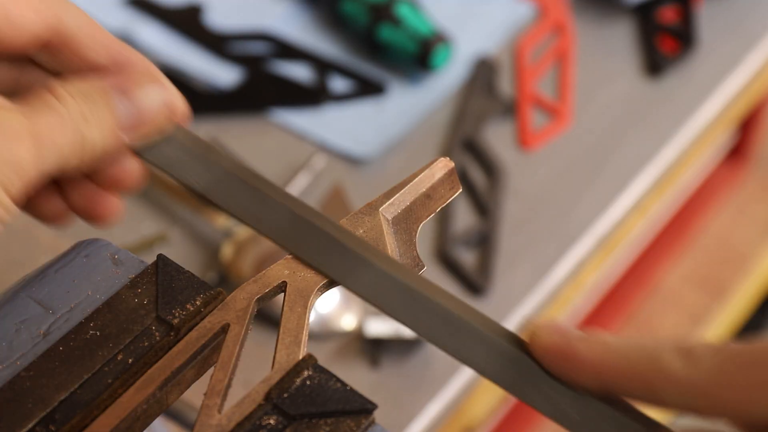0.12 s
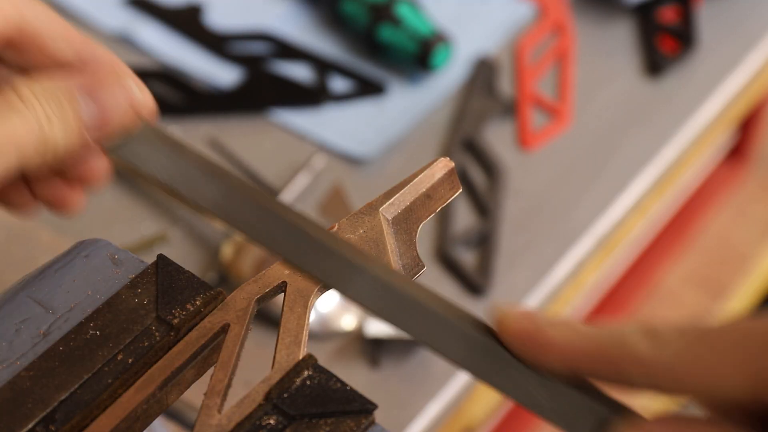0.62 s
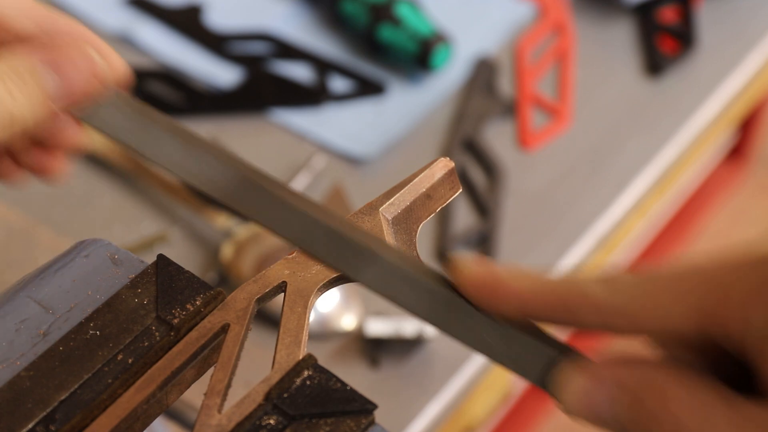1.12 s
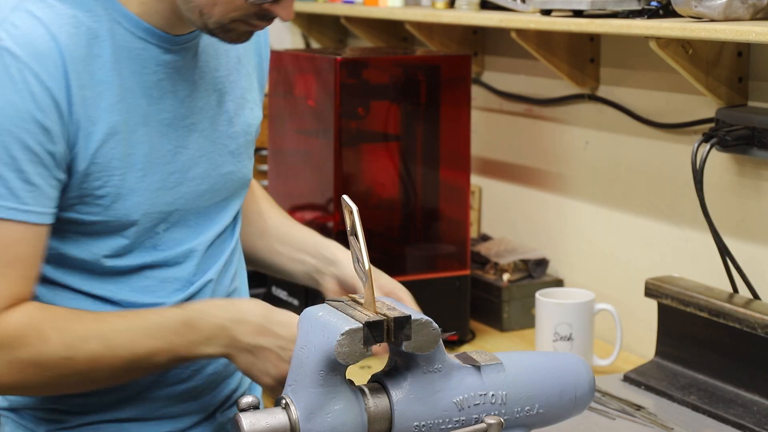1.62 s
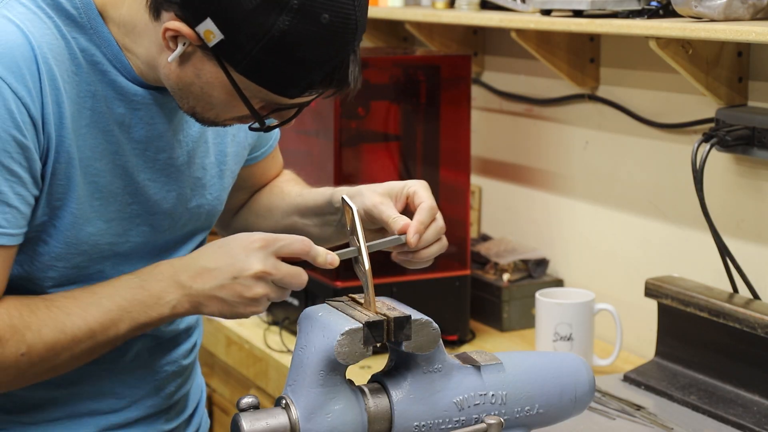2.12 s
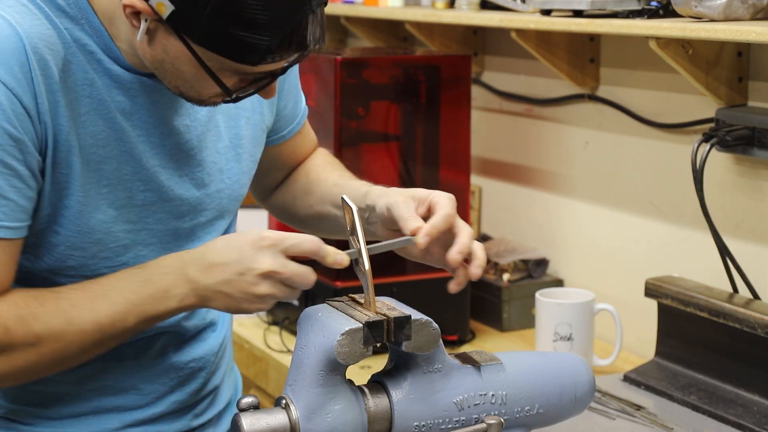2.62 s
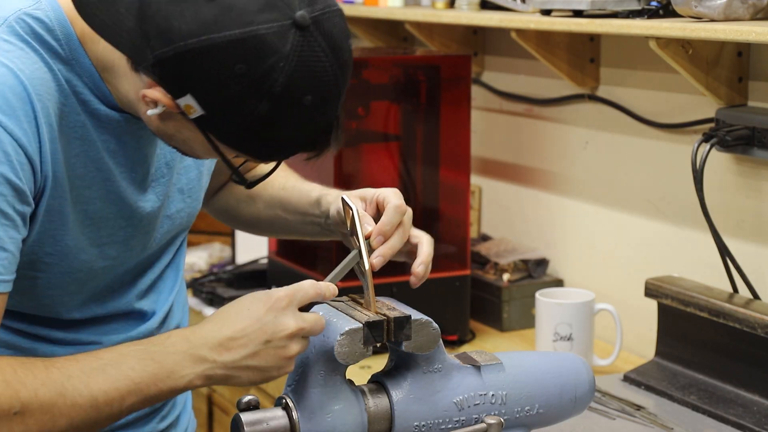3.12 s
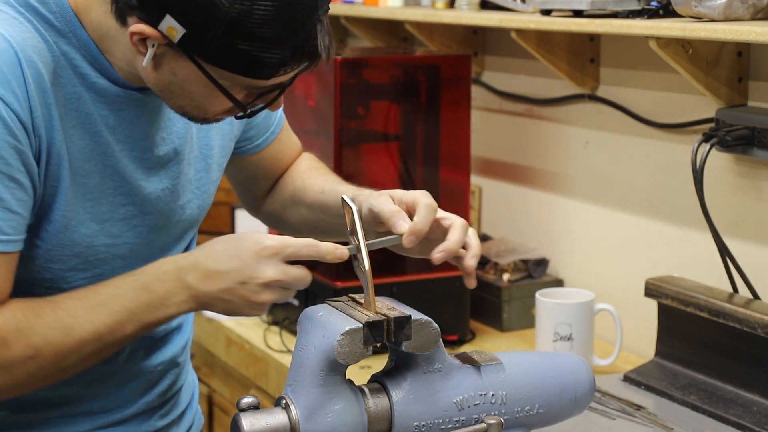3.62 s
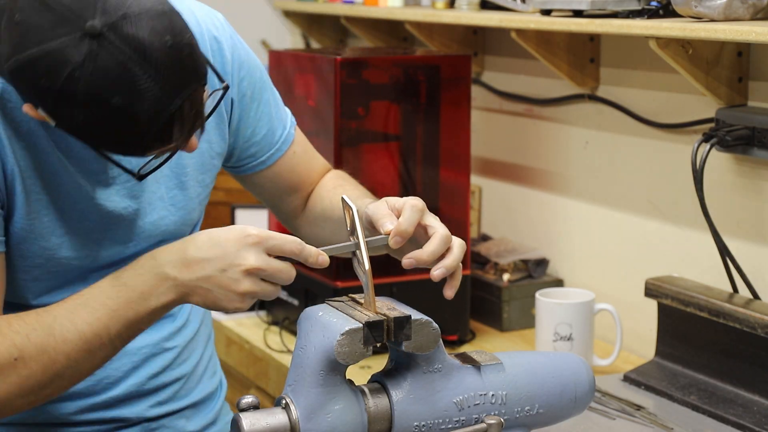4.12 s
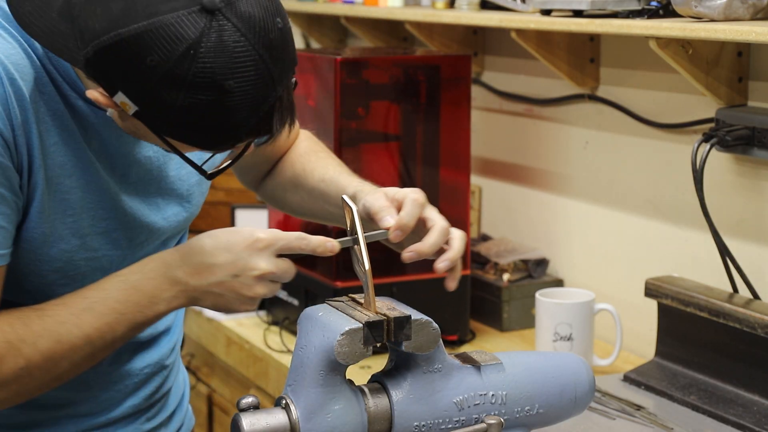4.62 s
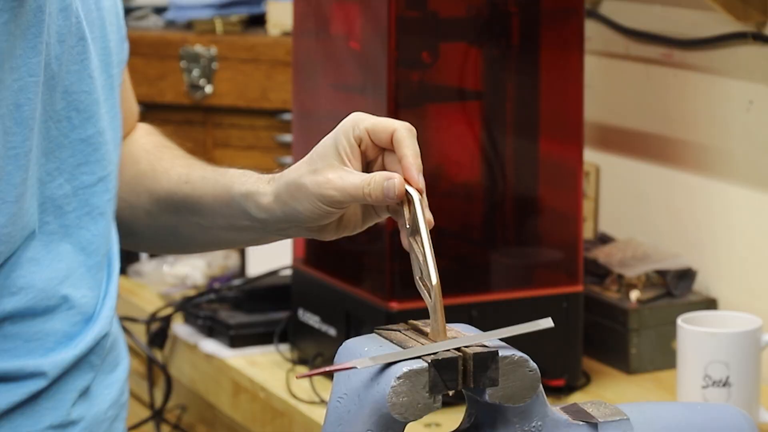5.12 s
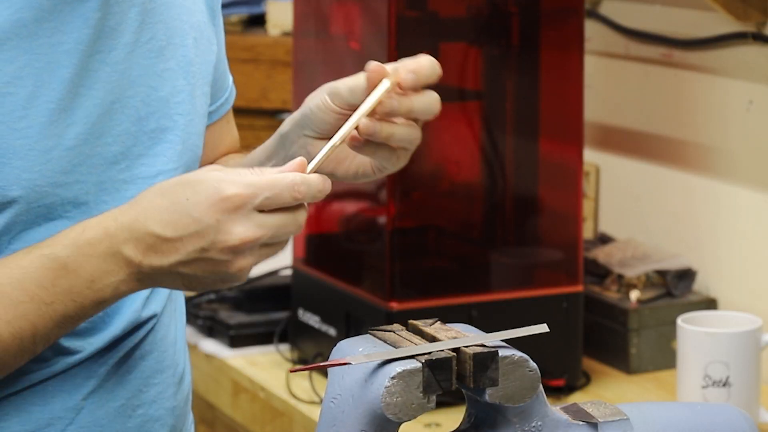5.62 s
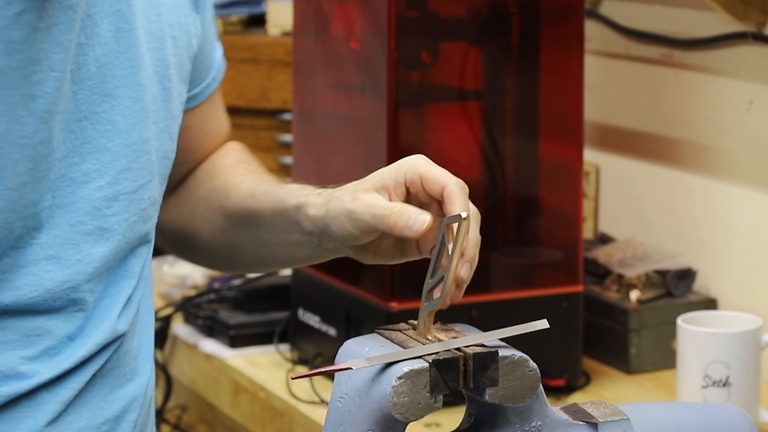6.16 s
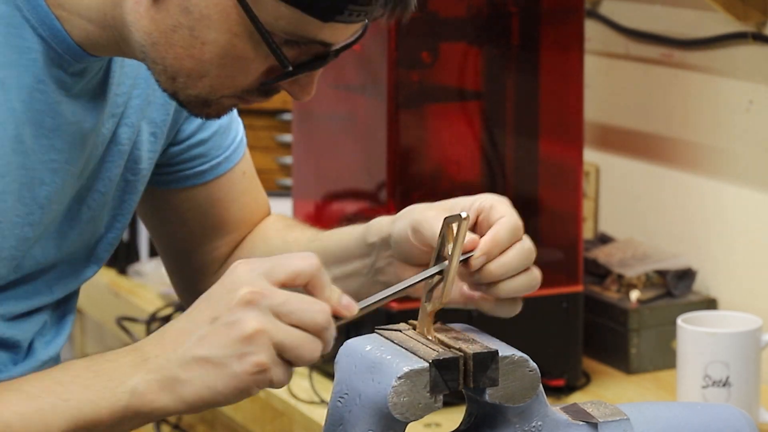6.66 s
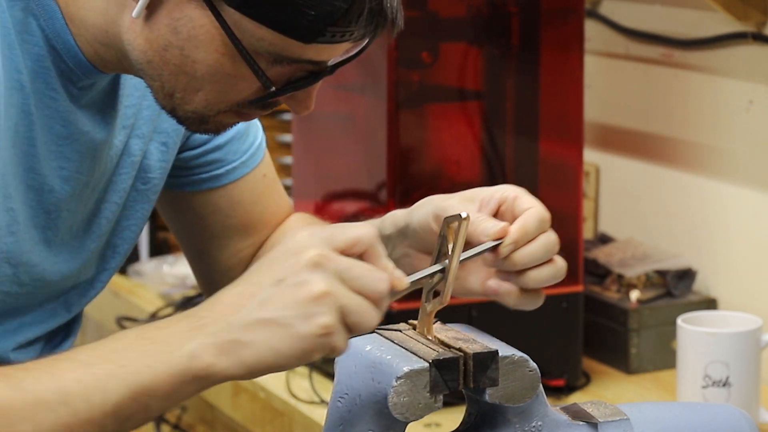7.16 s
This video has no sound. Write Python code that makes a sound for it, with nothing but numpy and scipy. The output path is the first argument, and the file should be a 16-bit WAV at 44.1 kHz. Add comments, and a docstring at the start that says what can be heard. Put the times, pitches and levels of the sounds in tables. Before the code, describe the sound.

Sped-up metal filing: bright squealing scrapes over faint workshop whirr, sharp metallic knocks as the piece is reclamped, then a short final bout.

```python
"""A workshop bench: room air and a motor, then sharp knocks and short rubs of metal.
A hand file rasps on a thin casting in a vise, its short strokes sped up to a very quick pace; the motor swells.
At 1.54 s the scene cuts to different room air and a steady whine, and the second grip is filed.
From 5.2 s the casting is taken out, handled and clamped again, with faint whistles; a third bout follows.
Scrapes and rings are shaped noise; motor, whine, whistles and squeaks are sines; a short tail is the room."""
import sys
import numpy as np
from scipy import signal
from scipy.fft import rfft, irfft, next_fast_len
from scipy.io import wavfile
from scipy.ndimage import uniform_filter1d, map_coordinates

SR = 44100
rng = np.random.default_rng(int(sys.argv[2]) if len(sys.argv) > 2 else 0)


def how_loud(loudness_db):
    """Turn decibels into a plain amplitude multiplier (0 dB gives 1, 20 dB gives 10)."""
    steps = np.asarray(loudness_db, float) / 20
    return 10 ** steps


def to_wav(s):
    """Save 16-bit WAV."""
    ch = np.atleast_2d(s).T  # columns
    pcm = np.round(np.clip(ch, -1, 1) * 32767)  # PCM
    wavfile.write(sys.argv[1], SR, pcm.astype(np.int16))


N = 320607
TIME = np.arange(N) / SR
CUT_S = 1.5445  # the scene cuts here from the first room air and motor to the second room air and whine

# room air before the cut, spectrum shape: pitch_hz [Hz], density_db [dB per Hz, relative]
FIRST_AIR = [(100, -40), (300, -18), (600, -0.5), (1000, -1.5), (1500, -6), (2400, 3.5), (3100, -10.5),
             (9400, -4.5), (16000, -19.5)]
# its level: time_s [s], level_db [dB rms]
FIRST_AIR_LEVEL = [(0, -68), (.9, -63), (1.15, -59.5), (1.3, -59.5), (1.45, -53), (1.545, -58.5)]
# a motor that speeds up and swells: time_s [s], pulse_rate_hz [Hz], swell_db [dB, before each order's share]
MOTOR = [(0, 187.4, 7), (1.051, 187.7, 9.5), (1.175, 198.4, 11.5), (1.25, 200.5, 12), (1.331, 201.5, 20.5),
         (1.4, 203.7, 19), (1.451, 204, 8), (1.545, 202.4, 8)]
# its tones: multiple [of the pulse rate], level_db [dB rms before waver and swell], swell_share [factor]
MOTOR_ORDERS = [(4, -84, 1.23), (5, -81, 0.43), (6, -79.5, 0.3), (7, -88.5, 1.17), (8, -94, 1.68),
                (10, -89, 1), (11, -92, 0.74)]
# knocks of metal on metal: start_s [s], peak_db [dB, sharp part], low_db [dB, low part against the sharp],
# fall_60_db_s [s, at least 0.004 is used], brightest_hz [Hz]
KNOCKS = [(0.02, -26.5, -27, 0.024, 4600), (0.059, -36, -35, 0.014, 4600), (0.2217, -44, -5.5, 0.03, 1480),
          (1.5401, -21.5, -46, 0.0032, 5200), (1.6472, -32, -33, 0.011, 3080),
          (1.6593, -36, -36, .008, 7500), (2.5, -50, -20, 0.014, 5000), (2.5344, -38, -35, 0.05, 3480),
          (2.5525, -37.5, -9, 0.014, 2500), (3.904, -49.5, 2, 0.013, 4040), (4.3455, -37, -33, 0.033, 5100),
          (4.7285, -38.5, -36, 0.027, 2700), (5.1869, -19, -28, 0.012, 2900),
          (5.2055, -31.5, -18.5, 0.018, 3050), (5.3616, -46.5, -23, 0.035, 3800),
          (5.7685, -50.5, -32, 0.048, 7000), (5.962, -39.5, -22, 0.028, 5100),
          (5.9789, -40.5, -21, 0.02, 4960), (6.0394, -38, -19, 0.023, 4940),
          (6.0636, -43, -31, 0.016, 5040), (6.1195, -51, -48, .02, 7000),
          (6.1422, -23.5, -27.5, 0.016, 4500), (6.15, -37, -25, 0.032, 2800),
          (6.168, -44, -47, 0.017, 7500), (6.175, -40, -36, 0.018, 1890), (6.204, -45.5, -10, 0.018, 2200),
          (6.217, -30.5, -39, 0.057, 7500), (6.2338, -31.5, -3, 0.02, 2070),
          (6.3224, -45.5, -43, 0.038, 5000)]
# short modes of a knocked casting: pitch_hz [Hz], level_db [dB, relative], fall_20_db_s [s]
KNOCK_MODES = [(1803, 3, 0.02), (2800, -4.5, 0.005), (3450, -6.5, 0.017), (3930, -11, 0.02),
               (5400, -10.5, .02), (5770, 1, 0.0069), (7000, -1, 0.019), (7900, 4.5, .015),
               (8620, 3, 0.028)]
# short grainy rubs and slides, in handling and between file strokes: start_s [s], end_s [s],
# level_db [dB rms before grain and fade], brightness_db [dB per octave]
RUBS = [(0.024, 0.064, -45.5, 6), (0.059, 0.118, -57, -1.5), (1.48, 1.513, -53, 9), (1.56, 1.585, -63, 5),
        (1.599, 1.611, -64, 7), (1.634, 1.682, -46.5, 4), (1.687, 1.72, -64, 3), (1.723, 1.736, -60, 12),
        (1.822, 1.84, -67, 1), (1.788, 1.813, -54.5, 3.5), (1.948, 1.967, -43.5, 0),
        (1.981, 1.985, -54, -7), (2.547, 2.56, -59, -6), (4.344, 4.358, -43.5, 7), (5.181, 5.193, -32, 2.5),
        (5.193, 5.221, -56, -2.5), (5.409, 5.44, -47, 4), (5.896, 5.93, -62, -1), (6.027, 6.077, -51, 0.5),
        (6.116, 6.137, -62.5, -1), (6.15, 6.194, -64, -3), (6.198, 6.259, -51.5, 1.5),
        (6.263, 6.28, -56, 3.5), (6.303, 6.338, -59, -1.5), (6.386, 6.422, -57, 6),
        (6.445, 6.454, -54.5, 6), (6.489, 6.536, -63.5, 5.5), (7.081, 7.104, -68, -3),
        (7.167, 7.205, -56.5, -3.5)]
# one table a grip, one row for each stroke that bites: hardest_bite_s [s], squeal_db [dB, both parts together],
# lean_db [dB, upper squeal against lower]
STROKES = [
    [(0.127, -39.5, -15), (0.157, -48, -27), (0.182, -46, -24), (0.232, -42.5, -29), (0.266, -44, -11),
     (0.289, -40, -2), (0.338, -40.5, 3), (0.359, -47, -10), (0.388, -42, -10), (0.416, -53, -15),
     (0.444, -37, -3), (0.465, -54, -15), (0.512, -52, -6), (0.536, -47, 4), (0.55, -44.5, 1),
     (0.578, -45, -10), (0.593, -41.5, -24), (0.609, -56.5, -27), (0.635, -43.5, -11), (0.65, -43.5, -7),
     (0.674, -48, -18), (0.691, -46, -15), (0.715, -50, -10), (0.733, -45.5, -11), (0.774, -46, -9),
     (0.794, -41.5, -6), (0.811, -45.5, -7), (0.834, -39.5, -5), (0.851, -41, -16), (0.878, -37.5, -10),
     (0.892, -39.5, -2), (0.961, -44, 0), (0.97, -30.5, -8.5), (0.978, -47, 8), (1.02, -48.5, -12),
     (1.029, -34.5, -17), (1.037, -58, 0), (1.068, -70, -5), (1.085, -42, -11), (1.107, -41, -12),
     (1.125, -51, 2), (1.142, -45, -16), (1.17, -45.5, -7), (1.213, -39.5, 0), (1.237, -44, -12),
     (1.252, -42, -4), (1.279, -35, -14), (1.322, -38, -12), (1.339, -40, -9), (1.379, -41, -8),
     (1.397, -37.5, -6), (1.429, -40, -5), (1.443, -45, -13), (1.459, -48, -12), (1.478, -51, -2)],
    [(1.87, -52, 9), (1.885, -73, 8), (1.917, -36.5, 7), (1.928, -30.5, -7), (1.962, -35, -1),
     (1.985, -35, 5), (2.015, -31, -5), (2.039, -31.5, -3), (2.077, -33, 4), (2.103, -28.5, -0.5),
     (2.136, -36, -3), (2.176, -36.5, 10), (2.214, -33, 2), (2.25, -34, 7), (2.285, -39.5, -4),
     (2.329, -42, 10), (2.367, -44.5, -8), (2.404, -42, -6), (2.442, -50.5, -11.0), (2.481, -66, 16),
     (2.516, -53, 6), (2.539, -37.5, 23), (2.553, -51, 23), (2.589, -45, 12), (2.633, -42.5, -11),
     (2.67, -43, -2), (2.709, -42.5, -9), (2.747, -39, 7), (2.78, -43, 17), (2.817, -43.5, 1),
     (2.868, -45, 5), (2.889, -45.5, 10), (2.905, -41, -16), (2.922, -38.5, -6), (2.942, -39.5, -4),
     (2.963, -43.5, 1), (2.997, -44, -4), (3.032, -44.5, 4), (3.065, -44.5, -7), (3.094, -48.5, -1),
     (3.169, -60, 3), (3.191, -78, 9), (3.214, -56, 1), (3.238, -58, 13), (3.264, -53.5, -1),
     (3.292, -51.5, -15), (3.325, -58, 1), (3.386, -46, 14), (3.416, -38.5, 21), (3.455, -46, 18),
     (3.47, -48, 8), (3.495, -36.5, 26), (3.532, -35, 26), (3.569, -44.5, 8), (3.602, -46.5, 8),
     (3.639, -45, 5), (3.672, -37, 5), (3.709, -46, 7), (3.742, -46, -2), (3.78, -47, 1), (3.813, -49.5, 2),
     (3.848, -48, -2), (3.888, -44, 3), (3.916, -45.5, -8), (3.952, -50.5, 0), (3.986, -52.5, 4),
     (4.013, -52, -8), (4.03, -57.5, -5), (4.056, -68, -4), (4.18, -54.5, -12), (4.195, -59, -2),
     (4.25, -61.5, 4), (4.294, -55.5, 4), (4.32, -61, 2), (4.348, -46, 6), (4.378, -75, 12),
     (4.397, -60, 17), (4.414, -56, 14), (4.435, -51, 14), (4.451, -51, 9), (4.469, -50, 15),
     (4.485, -52.0, 1), (4.501, -47.5, 18), (4.532, -47.5, 16), (4.566, -44, 18), (4.599, -50, 14),
     (4.637, -41.5, 22), (4.668, -43.5, 17), (4.698, -48.5, 15), (4.714, -51, 13), (4.729, -41.5, 13),
     (4.764, -45, 28), (4.796, -46.5, 14), (4.826, -46, 31), (4.861, -46, 18), (4.892, -46.5, 9),
     (4.926, -50, 12), (4.962, -48, 18), (4.996, -50, 11), (5.028, -47.5, 18), (5.059, -47.5, 4),
     (5.091, -42, 21), (5.124, -47.5, 25), (5.157, -47, 5)],
    [(6.584, -46.5, 18), (6.6, -73, -13), (6.618, -63, -10), (6.645, -39.5, 12), (6.671, -38, 15.5),
     (6.73, -35.5, 22), (6.784, -37.5, 15.5), (6.812, -50, -7), (6.829, -33.5, 10.5), (6.85, -42.5, 9),
     (6.88, -39, 20), (6.92, -44.0, 20), (6.957, -46.5, 11), (6.994, -54, 12), (7.028, -51.5, 12),
     (7.07, -55, 12), (7.085, -59, 8), (7.099, -69, 5), (7.165, -68, 15), (7.191, -50, 12),
     (7.231, -51.5, 21), (7.245, -63, -4), (7.259, -52.5, -10)],
]
# one row a grip, gaps between bites that hold a return stroke: shortest_ms [ms], longest_ms [ms]
# a longer gap is a pause
RETURN_GAPS = [(36, 54), (27, 48), (33, 62)]
# one row a grip, the lighter return stroke: squeal_db [dB against the weaker neighbour],
# lean_db, scrape_db, body_db [dB, added]
RETURNS = [(-3, -12, -1, -3.5), (-7, -4.5, -2.5, -3.5), (-10.5, -15, 1.4, -1)]
# one table a grip, the hands: time_s [s], pressure_db [dB, scrape above 10 kHz],
# freedom_db [dB, how freely the casting rings]
HANDS = [
    [(.12, -53.5, -57), (.45, -53, -60), (.62, -54, -65.5), (.85, -52.5, -56.5), (1.1, -55, -65),
     (1.3, -49.5, -54.5), (1.45, -52, -61)],
    [(1.88, -70.5, -60.5), (1.93, -59.5, -61), (1.96, -50.5, -71), (2.05, -62, -59.5), (2.3, -60.5, -61),
     (2.46, -72.5, -62.5), (2.54, -64, -54.5), (2.62, -66.5, -60), (2.88, -62.5, -61), (3.08, -70, -59),
     (3.2, -65, -69), (3.32, -77.5, -59), (3.41, -64, -56.5), (3.6, -70, -57.5), (4, -71.5, -62),
     (4.06, -74, -68), (4.25, -76.5, -70), (4.3, -82, -58.5), (4.35, -67.5, -55.5), (4.4, -71.5, -59.5),
     (4.7, -70, -58.5), (4.73, -68, -59.5), (4.77, -67.5, -56.5), (5.16, -69, -57.5)],
    [(6.58, -64, -65), (6.645, -60.5, -71), (6.67, -62.5, -67), (6.73, -57.5, -65.5), (6.785, -56, -62),
     (6.83, -53, -65), (6.88, -63, -62), (6.96, -63.5, -62.5), (7.03, -60, -56), (7.07, -66, -65),
     (7.1, -75, -73), (7.16, -70, -59), (7.19, -70, -71), (7.235, -63, -79), (7.26, -58.5, -75)],
]
# body of the casting, one pair a grip: rings struck at the bite, then rings dragged along the travel:
# pitch_hz [Hz], width_hz [Hz between points 7 dB down], level_db [dB, relative]
BODY_RINGS = [([(2280, 230, 1.5), (3260, 200, -9.5)], [(2300, 340, 4.5), (940, 390, -13)]), ([(1317, 94, 5),
              (1870, 250, -5), (2700, 740, -17), (3640, 220, -9), (4600, 300, -14.5)], [(837, 274, -0.5),
              (1330, 75, -4.5), (1714, 470, -0.5)]), ([(1480, 60, 3), (795, 230, -11.5)], [(1480, 150, 3.5),
              (776, 310, -6), (2440, 460, -21)])]
# squealing rings of file and casting, one table a grip: pitch_hz [Hz], width_hz [Hz, as above],
# level_db [dB, relative]
SQUEAL_RINGS = [
    [(3985, 290, -5.5), (4330, 160, -13.5), (5235, 410, 2.5), (5880, 320, -4.5), (6380, 79, 0.5),
     (7020, 114, 4), (7500, 310, -2.5), (8120, 170, -1), (8370, 99, 0.5)],
    [(6725, 210, -13.5), (7570, 78, 3), (8630, 220, 3.5), (8827, 220, 3), (9320, 170, -13.5)],
    [(2900, 250, -19), (3670, 250, -9), (4600, 200, -5), (5260, 170, -8), (5900, 210, -12.5),
     (6790, 250, -9.5), (7630, 630, -8), (8430, 29, 13), (8510, 510, -3.5), (9180, 83, 0)],
]
# edges of the lower and the upper squeal: pitch_hz [Hz]
SQUEAL_EDGES = [2500, 8000, 10000]
# broad scrape of the teeth, one table a grip: pitch_hz [Hz], density_db [dB per Hz, mean above 10 kHz is 0]
SCRAPES = [
    [(300, -4.5), (700, -14), (1500, -10.5), (3000, -6.5), (5500, 7), (8500, 4), (10000, -11), (11400, 2.5),
     (12300, -4.5), (13200, 1), (15500, -10)],
    [(300, -9), (700, -18), (2000, 1.5), (2600, -3), (3700, -2), (5000, -1.5), (6000, 2), (6800, 11.5),
     (9000, 5), (10500, -1.5), (12500, -3), (14500, -2.5), (15700, 4), (16300, -11)],
    [(300, -17), (800, -8.5), (1200, -5), (2200, -4), (3000, -1.5), (7000, -3), (8500, 4.5), (10500, 2),
     (14500, -8), (15700, -0.5), (16300, -9)],
]
# contact of file and edge, one row a grip: squeal_hop_db [dB, from ring to ring], scrape_patch_db [dB],
# bite_scrape_db [dB, extra scrape power at the bite],
# body_drag_db [dB, dragged body ring along the travel against the struck ring]
CONTACTS = [(4.5, 3.5, -4, 0), (4.5, 2.5, 4, -2.5), (3, 2, -5, -1.5)]
# the file ticks as it is set back on the edge: start_s [s], peak_db [dB before the low cut], fall_60_db_s [s]
TICKS = [(0.9498, -31, 0.0098), (0.9954, -29, 0.02), (1.0083, -51, 0.012), (1.0581, -23, 0.0095),
         (1.4719, -26.5, 0.011)]
# a rising motor partial (first table), then faint gliding whistles, one table each:
# time_s [s], pitch_hz [Hz], level_db [dB peak before waver]
GLIDES = [
    [(1.24, 2230, -76), (1.3, 2250, -56), (1.36, 2320, -64), (1.43, 2480, -61)],
    [(5.1, 592, -69), (5.17, 635, -70), (5.27, 590, -87), (5.33, 548, -93), (5.43, 628, -72),
     (5.52, 700, -79), (5.58, 784, -70), (5.63, 780, -77), (5.69, 877, -74), (5.71, 900, -84)],
    [(5.62, 980, -82), (5.72, 1123, -83), (5.8, 1083, -79), (5.87, 1090, -86)],
    [(5.72, 732, -80), (5.79, 809, -77), (5.83, 775, -85), (5.88, 762, -70), (5.93, 780, -89),
     (6, 701, -75), (6.15, 668, -84), (6.22, 576, -84)],
]
# the casting sings out on one ring while the file sticks and slips: start_s [s], length_s [s],
# level_db [dB rms before its swell], pitch_hz [Hz]
SQUEAKS = [(1.471, 0.009, -32, 7100), (1.909, .012, -52, 870), (1.92, 0.0094, -43.5, 3730),
           (1.946, 0.023, -57.5, 1316), (1.951, .012, -47.5, 3300), (1.963, .007, -49, 1950),
           (2.007, 0.0092, -50, 3800), (2.808, 0.018, -26.5, 7590), (3.09, 0.009, -36, 7550),
           (4.391, 0.012, -59, 1300), (4.495, 0.015, -56, 1310), (4.529, 0.015, -59, 1316),
           (4.565, 0.0095, -52, 1316), (4.726, 0.0096, -47, 1320), (4.731, 0.0097, -54, 2740),
           (4.759, 0.012, -57, 1303), (4.788, 0.011, -51, 1326), (4.823, 0.011, -53.5, 1313),
           (4.963, 0.015, -72, 1310), (4.985, .018, -60, 1330), (5.052, 0.013, -53, 1296),
           (6.655, 0.043, -55.5, 1480), (6.716, 0.023, -54.5, 1480), (6.768, 0.033, -47.5, 1480),
           (6.818, 0.025, -56, 1480), (7.06, 0.046, -53, 1480), (7.222, 0.051, -52.5, 1480)]
# room air after the cut, spectrum shape: pitch_hz [Hz], density_db [dB per Hz, relative]
SECOND_AIR = [(100, -30), (300, -13), (650, -4), (1000, -6.5), (2000, -5.5), (3000, -8.5), (5000, -12),
              (9000, -16), (16000, -23)]
# its level: time_s [s], level_db [dB rms]
SECOND_AIR_LEVEL = [(1.5, -75), (3, -66.5), (5.2, -68.5), (5.6, -70.5), (6, -68), (6.6, -74), (7.3, -70.5)]
# tones of the whine: multiple [of its base pitch], level_db [dB rms before waver and swell]
WHINE_ORDERS = [(1, -79), (2, -78.5), (3, -83)]
# swell of its upper tones: time_s [s], swell_db [dB]
WHINE_SWELL = [(1.5, -2.5), (5.1, 2), (5.25, 6), (7.3, 0)]


def evened(x):
    """Scales to rms 1."""
    return x / np.sqrt(np.mean(x ** 2) + 1e-20)


def read(points, hz):
    """Reads a spectrum on a log-frequency axis."""
    f, value = np.transpose(points)
    return np.interp(np.log(hz + 1), np.log(f + 1), value)


def smooth(x, s):
    """Two running means of s seconds."""
    size = max(round(s * SR), 1)
    return uniform_filter1d(uniform_filter1d(x, size), size)


def waver(size, s):
    """Slow random drift at rms 1: noise smoothed over s seconds."""
    return evened(smooth(rng.standard_normal(size), s))


def follow(points):
    """Reads a (time, value) table along the whole scene."""
    return np.interp(TIME, *np.transpose(points))


def coloured(size, gain, ticks=0):
    """Noise, with ticks mixed in if given, shaped to the magnitude gain(hz), at rms 1."""
    fast = next_fast_len(size)
    spectrum = rfft(rng.standard_normal(size) + ticks, fast)
    shaped = spectrum * gain(np.fft.rfftfreq(fast, 1 / SR))
    return evened(irfft(shaped, fast)[:size])


def add(mix, s, sound):
    """Adds a sound into the mix at time s."""
    part = mix[round(s * SR):][:len(sound)]
    part += sound[:len(part)]


def first_air():
    """Room air before the cut: shaped noise that follows its level table."""
    return how_loud(follow(FIRST_AIR_LEVEL)) * coloured(N, lambda hz: how_loud(read(FIRST_AIR, hz)))


def motor():
    """Multiples of one slightly jittering pulse rate, each wavering and taking its share of the swell."""
    s, rate_hz, swell_db = np.transpose(MOTOR)
    turns = np.cumsum(np.interp(TIME, s, rate_hz) * (1 + 0.008 * waver(N, 0.0023))) / SR
    out = np.zeros(N)
    for multiple, db, share in MOTOR_ORDERS:
        level_db = db + 3 * waver(N, 0.058) + share * np.interp(TIME, s, swell_db)
        out += np.sqrt(2) * how_loud(level_db) * np.sin(2 * np.pi * (multiple * turns + rng.random()))
    return out


def knock(peak_db, low_db, t60, bright_hz, ring_db=-2, low_hz=700, low_longer=1.72):
    """A crack of noise, the casting's short modes and a dull low part that lasts a little longer."""
    t = np.arange(round(.12 * SR)) / SR

    def place(hz):  # weakens by 9.5 dB an octave away from the brightest region
        return how_loud(-9.5 * abs(np.log2((hz + 1) / bright_hz)))

    crack = coloured(len(t), lambda hz: place(hz) * hz / (hz + 1500))
    modes = np.zeros(len(t))
    for hz, db, fall_s in KNOCK_MODES:
        tone = np.sin(2 * np.pi * (hz * rng.uniform(0.943, 1.04) * t + rng.random()))
        modes += place(hz) * how_loud(db - 20 * t / fall_s) * tone

    def low_shape(hz):  # a hump at low_hz, cut below 530 Hz
        hump = 1 / (0.75 + (hz / low_hz - low_hz / (hz + 1)) ** 2) ** 1.9
        return hump * hz ** 4 / (hz ** 4 + 530.0 ** 4)

    low = coloured(len(t), low_shape)
    rise = np.minimum(t / .0006, 1)
    sharp = rise * how_loud(-60 * t / max(t60, .004)) * (crack + how_loud(ring_db) * modes)
    dull = rise * how_loud(-60 * t / max(low_longer * t60, .004)) * low
    return how_loud(peak_db) * (sharp / abs(sharp).max() + how_loud(low_db) * dull / abs(dull).max())


def room(x, t60=0.046, dull_hz=6000):
    """A short diffuse tail off bench and wall, duller than the direct sound."""
    t = np.arange(round(.12 * SR)) / SR
    noise = coloured(len(t), lambda hz: 1 / (1 + (hz / dull_hz) ** 2))
    tail = noise * how_loud(-60 * t / t60) * (t > .002)
    return signal.fftconvolve(x, tail / np.linalg.norm(tail))[:N]


def rub(length, db, tilt_db, grain_db=3.5):
    """Grainy wide noise that starts quickly and fades."""
    size = round(max(length, .005) * SR)

    def shape(hz):
        tilt = how_loud(tilt_db * np.log2((hz + 50) / 4000))
        return tilt * (hz / (hz + 900)) ** 2 / (1 + (hz / 12000) ** 2)

    noise = coloured(size, shape)
    grain = how_loud(grain_db * waver(size, .001))
    u = np.linspace(0, 1, size)
    return how_loud(db) * noise * grain * np.minimum(u / 0.38, 1) * np.sqrt(1 - u ** 2)


def strokes_of(bites, gaps_ms, returns, hands):
    """Adds the return strokes and gives every stroke its spread and its four levels."""
    return_db, return_lean_db, return_scrape_db, return_body_db = returns
    rows = []
    for (s, squeal_db, lean_db), after in zip(bites, list(bites[1:]) + [(np.inf, 0, 0)]):
        rows.append((s, squeal_db, lean_db, False))
        if gaps_ms[0] <= (after[0] - s) * 1000 < gaps_ms[1]:
            middle = s + 0.5 * (after[0] - s)
            weaker_db = min(squeal_db, after[1])
            rows.append((middle, weaker_db + return_db, (lean_db + after[2]) / 2 + return_lean_db, True))
    s, squeal_db, lean_db, back = np.transpose(rows)
    gap_ms = np.diff(s, prepend=-np.inf, append=np.inf) * 1000
    gap_ms = np.where(gap_ms < gaps_ms[1], gap_ms, 14.3)  # a pause counts as 14.3 ms
    spread_ms = 0.23 * (gap_ms[:-1] + gap_ms[1:]) / 2
    stands_out_db = squeal_db - uniform_filter1d(squeal_db, size=5)
    at, pressure_db, free_db = np.transpose(hands)
    scatter_db = 1.5 * rng.standard_normal((len(s), 2))  # chance from stroke to stroke
    # a bite that stands out also scrapes and rings the body more
    scrape_db = np.interp(s, at, pressure_db) + 0.3 * stands_out_db + return_scrape_db * back + scatter_db[:, 0]
    body_db = np.interp(s, at, free_db) + 0.2 * stands_out_db + return_body_db * back + scatter_db[:, 1]
    lower_db = squeal_db - 10 * np.log10(1 + how_loud(lean_db) ** 2)
    return np.transpose([s, spread_ms, scrape_db, body_db, lower_db, lower_db + lean_db])


def patchy(x, patch_db):
    """Random patches of a few hundred Hz and about 10 ms: the contact favours now one ring, now another."""
    z = signal.stft(x, nperseg=256, noverlap=192)[2]
    patches = rng.standard_normal(z.shape[::-1])
    patches = uniform_filter1d(uniform_filter1d(patches, size=7, axis=0), size=3, axis=1)
    return signal.istft(z * how_loud(patch_db * evened(patches).T), nperseg=256, noverlap=192)[1][:len(x)]


def stroke_powers(t, strokes, bite_db, body_drag_db, wide=1.8, bite_ms=3.86, late=0.65, squeal_drag_db=-11):
    """Power of scrape, struck body, dragged body, lower and upper squeal as the file travels and bites."""
    power = np.zeros((5, len(t)))
    for middle, spread_ms, scrape_db, body_db, *squeal_db in strokes:
        near = slice(*np.searchsorted(t, [middle - .05, middle + 0.047]))
        away_ms = (t[near] - middle) * 1000
        follow_ms = late * np.clip(spread_ms - bite_ms, 0, 5)  # a long stroke bites early and drags on
        # even speed, all but a stop at each turn
        travel = np.exp(-((away_ms - follow_ms) / (wide * spread_ms)) ** 4)
        travel += 0.012 * np.exp(-(away_ms / 20) ** 2)
        # a bite sets in over 0.59 of the time that it takes to let go
        bite_width_ms = np.where(away_ms < 0, 0.59, 1) * 0.83 * min(spread_ms, bite_ms)
        bite = np.exp(-(away_ms / bite_width_ms) ** 2 / 2)
        squeal = bite + how_loud(squeal_drag_db) ** 2 * travel
        power[0, near] += how_loud(scrape_db) ** 2 * (travel + how_loud(bite_db) ** 2 * bite)
        power[1, near] += how_loud(body_db) ** 2 * bite
        power[2, near] += how_loud(body_db + body_drag_db) ** 2 * travel
        power[3:, near] += how_loud(np.array(squeal_db))[:, None] ** 2 * squeal
    return power


def ringing(modes, ticks):
    """Noise and tooth ticks passed through a set of resonances."""
    def shape(hz):
        return np.sqrt(sum(how_loud(db) ** 2 / (1 + (2 * (hz - f) / width) ** 2) ** 2.36 for f, width, db in modes))

    return coloured(len(ticks), shape, ticks)


def filing(strokes, body, rings, scrape, contact, tick_db=-7, ticks_per_s=3000, grit_db=1.9, steady=0.89):
    """Teeth scrape the edge all along a stroke and ring the body; the rings squeal where they bite hardest."""
    squeal_hop_db, scrape_patch_db, bite_db, body_drag_db = contact
    start = strokes[0][0] - .04
    t = np.arange(start, strokes[-1][0] + 0.011, 1 / SR)
    power = stroke_powers(t, strokes, bite_db, body_drag_db)
    # uneven bite of single teeth
    grit = evened(smooth(rng.exponential(1, len(t)) ** 2 - 2, 0.0027))
    grit = how_loud(grit_db * np.minimum(grit, 2))
    # single teeth catching the edge
    ticks = rng.laplace(size=len(t)) * (rng.random(len(t)) < ticks_per_s / SR)
    ticks = how_loud(tick_db) * evened(ticks)
    # whole band against the band above 10 kHz
    f = np.linspace(300, 15500, num=200)
    whole = np.sqrt(np.mean(how_loud(read(scrape, f)) ** 2) * 15200 / 5800)
    teeth = coloured(len(t), lambda hz: how_loud(read(scrape, hz)) * (hz < 16500), ticks)
    out = whole * evened(patchy(teeth, scrape_patch_db) * grit) * np.sqrt(power[0])

    lower, upper = [[ring for ring in rings if lo <= ring[0] < hi]
                    for lo, hi in zip(SQUEAL_EDGES, SQUEAL_EDGES[1:])]
    struck, dragged = body
    parts = [(struck, 0, True), (dragged, scrape_patch_db, True),
             (lower, squeal_hop_db, False), (upper, squeal_hop_db, False)]
    for (modes, hop_db, shifts), level in zip(parts, power[1:]):
        part = ringing(modes, ticks)
        if shifts:  # the body rings shift as the contact moves
            drift = 0.015 * waver(len(t), 0.01177)
            part = map_coordinates(part, [np.arange(len(t)) + np.cumsum(drift)], order=3, mode="mirror")
        if hop_db:
            part = evened(patchy(part, hop_db))
        # chatter holds its own strength
        chatter = part / (smooth(part ** 2, 0.012) + 0.0012) ** (steady / 2)
        out += evened(chatter * grit ** 0.75) * np.sqrt(level)  # a ringing part smooths the grit
    return start, out


def tick(peak_db, t60):
    """The file set back on the edge: a light knock without its low end."""
    high_pass = signal.butter(N=2, Wn=3500, btype="high", fs=SR, output="sos")
    return signal.sosfilt(high_pass, knock(peak_db, -np.inf, t60, bright_hz=6100))


def glides():
    """A rising motor partial, then faint whistles: gliding sines with one shared wobble, wavering in level."""
    out = np.zeros(N)
    wobble = 1 + 0.0199 * waver(N, 0.002)
    for s, hz, db in map(np.transpose, GLIDES):
        level_db = np.interp(TIME, s, db, -np.inf, -np.inf) + 2.0 * waver(N, 0.067)
        cycles = np.cumsum(np.interp(TIME, s, hz) * wobble) / SR
        out += how_loud(level_db) * np.sin(2 * np.pi * cycles)
    return out


def squeak(length, db, hz):
    """A slightly unsteady tone that swells quickly and dies away."""
    u = np.linspace(0, 1, round(length * SR))
    pitch_hz = hz * (1 + 0.0092 * waver(len(u), 0.0037))
    swell = np.sin(np.pi * u ** 0.77) ** 0.84
    return np.sqrt(2) * how_loud(db) * swell * np.sin(2 * np.pi * (np.cumsum(pitch_hz) / SR + rng.random()))


def second_air():
    """Room air after the cut: shaped noise that follows its level table."""
    return how_loud(follow(SECOND_AIR_LEVEL)) * coloured(N, lambda hz: how_loud(read(SECOND_AIR, hz)))


def whine(base_hz=960):
    """A machine's steady tone and its multiples, wavering in level; the upper tones swell."""
    out = np.zeros(N)
    for multiple, db in WHINE_ORDERS:
        level_db = db + waver(N, 0.096) + (multiple > 1) * follow(WHINE_SWELL)
        out += np.sqrt(2) * how_loud(level_db) * np.sin(2 * np.pi * (multiple * base_hz * TIME + rng.random()))
    return out


def scene():
    """Filing, knocks and rubs in the room, over the workshop air before and after the cut."""
    work = np.zeros(N)
    for s, *blow in KNOCKS:
        add(work, s, knock(*blow))
    for start, end, db, tilt_db in RUBS:
        add(work, start, rub(end - start, db, tilt_db))
    grips = zip(STROKES, RETURN_GAPS, RETURNS, HANDS, BODY_RINGS, SQUEAL_RINGS, SCRAPES, CONTACTS)
    for *motion, body, rings, scrape, contact in grips:
        add(work, *filing(strokes_of(*motion), body, rings, scrape, contact))
    for s, *touch in TICKS:
        add(work, s, tick(*touch))
    for s, *note in SQUEAKS:
        add(work, s, squeak(*note))
    first = TIME < CUT_S
    before = work * first
    wet = np.where(first, room(before), room(work - before))  # no tail rings on across the cut
    workshop = np.where(first, first_air() + motor(), second_air() + whine()) + glides()
    return (work + how_loud(-10.0) * wet + workshop)[None]


def low_pass(x):
    """Removes everything above the highest recorded frequency."""
    return signal.sosfilt(signal.butter(12, 16640, fs=SR, output="sos"), x)


def record(dry):
    """At the microphone, bass and top treble are cut steeply; a faint low noise remains under it."""
    low_cut = signal.butter(N=6, Wn=450, btype="high", fs=SR, output="sos")
    top_cut = signal.ellip(N=6, rp=1, rs=40, Wn=16000, fs=SR, output="sos")
    thin = signal.sosfilt(top_cut, signal.sosfilt(low_cut, dry))

    def rumble_shape(hz):
        return .5 / (1 + (hz / 60) ** 2) + (hz / 190) ** 6 / (1 + (hz / 250) ** 8)

    rumble = how_loud(-96) * coloured(N, rumble_shape)
    return low_pass(thin + rumble)


dry = scene()
out = record(dry)
to_wav(out)
```